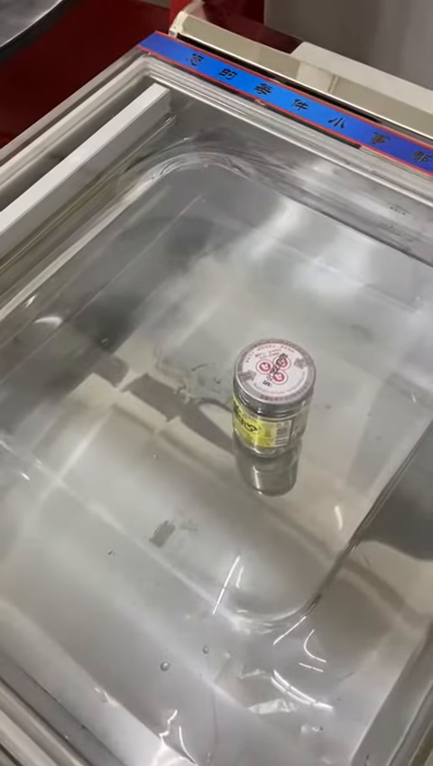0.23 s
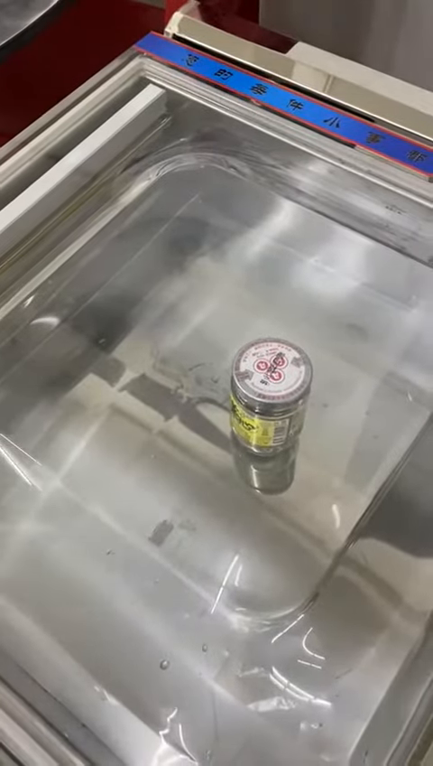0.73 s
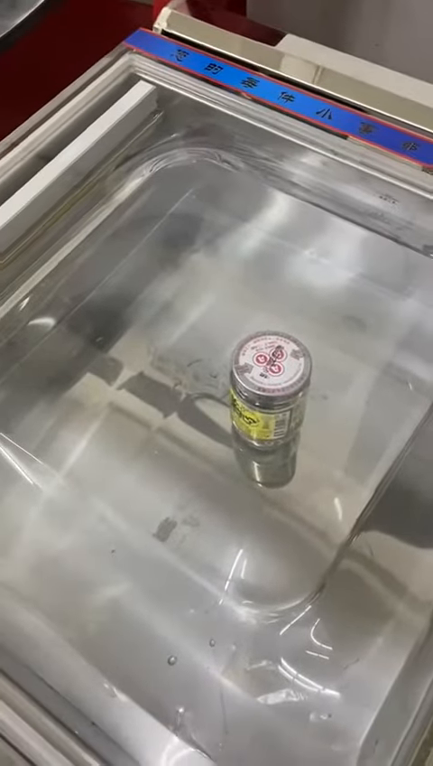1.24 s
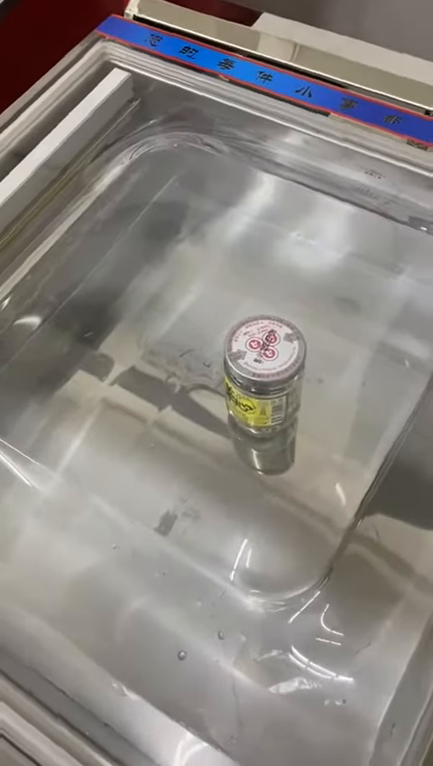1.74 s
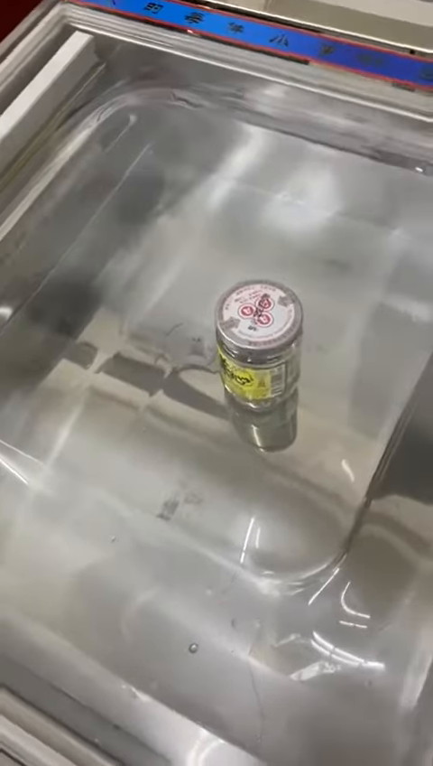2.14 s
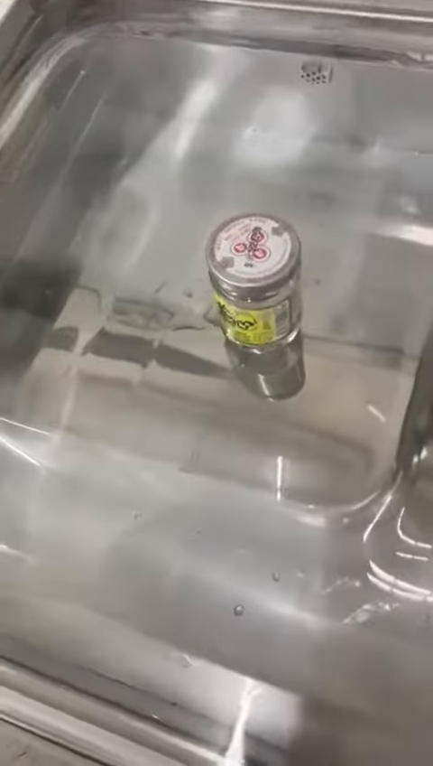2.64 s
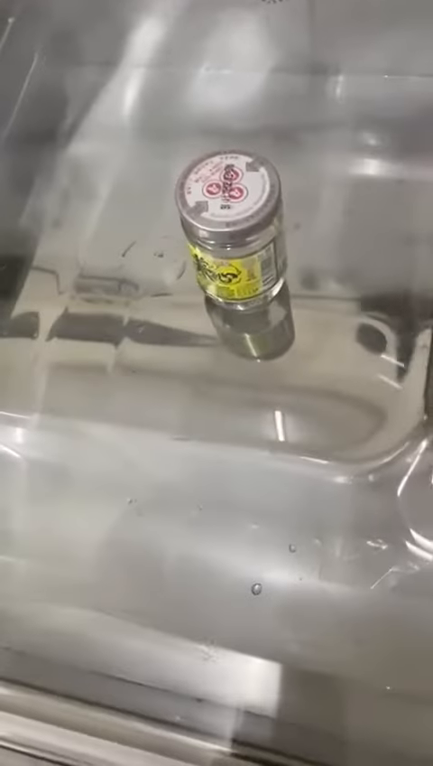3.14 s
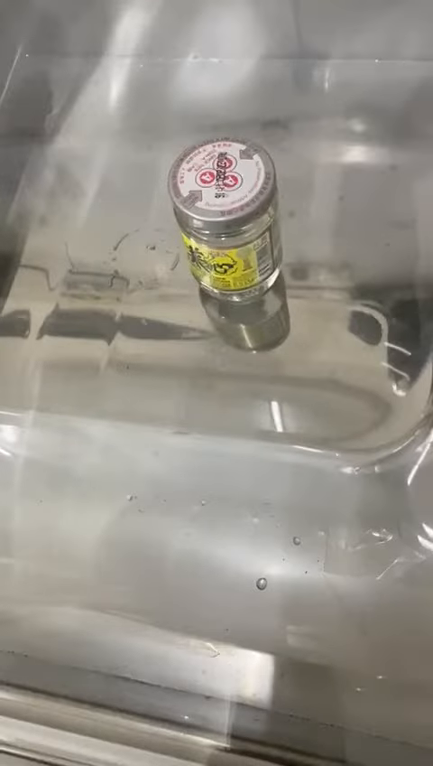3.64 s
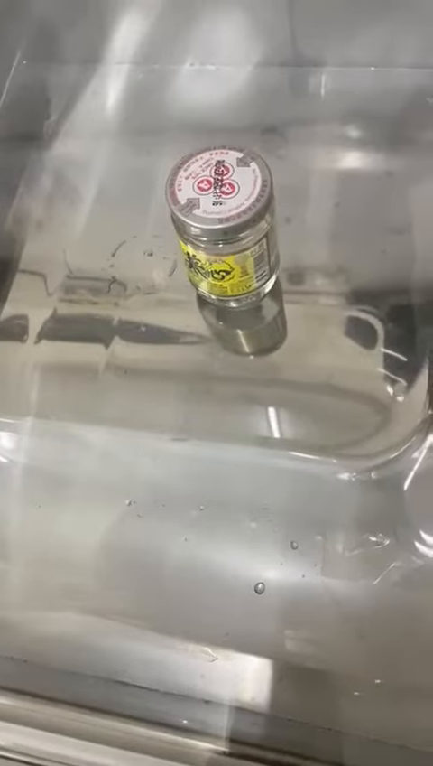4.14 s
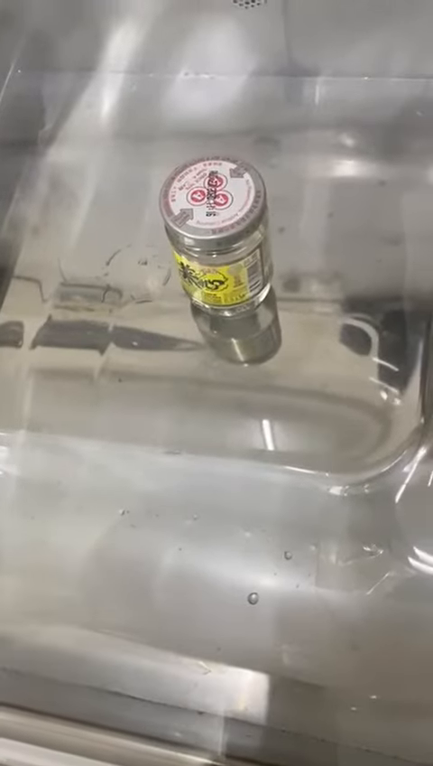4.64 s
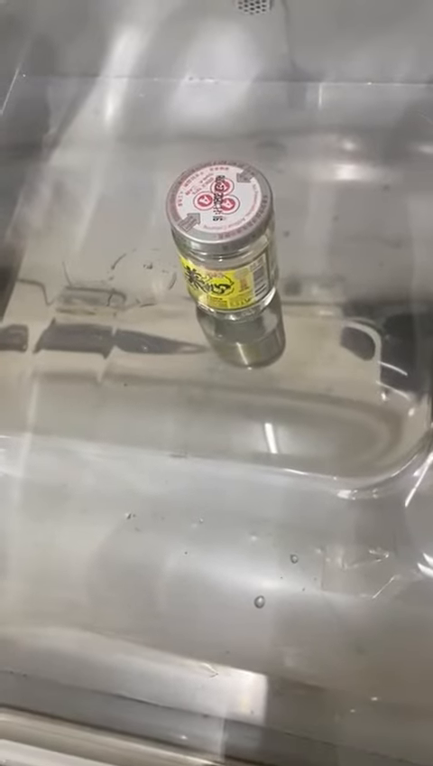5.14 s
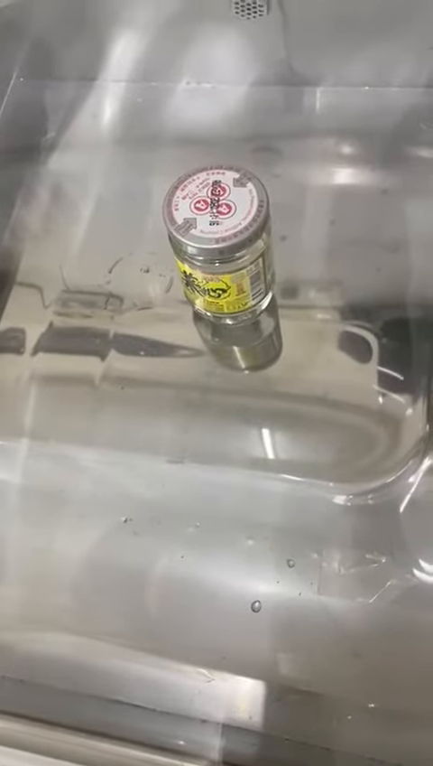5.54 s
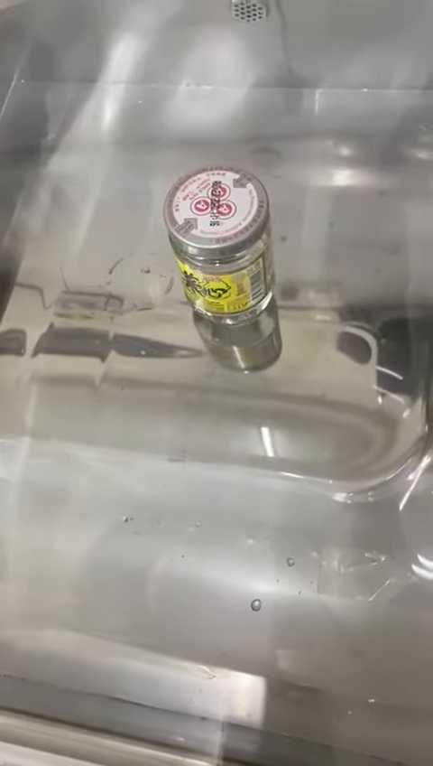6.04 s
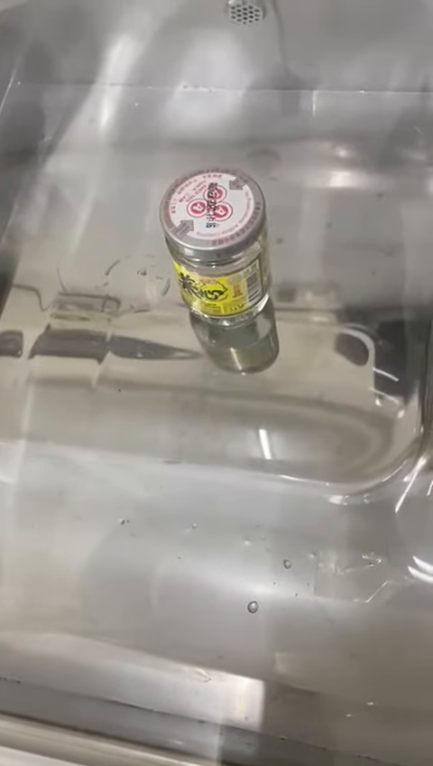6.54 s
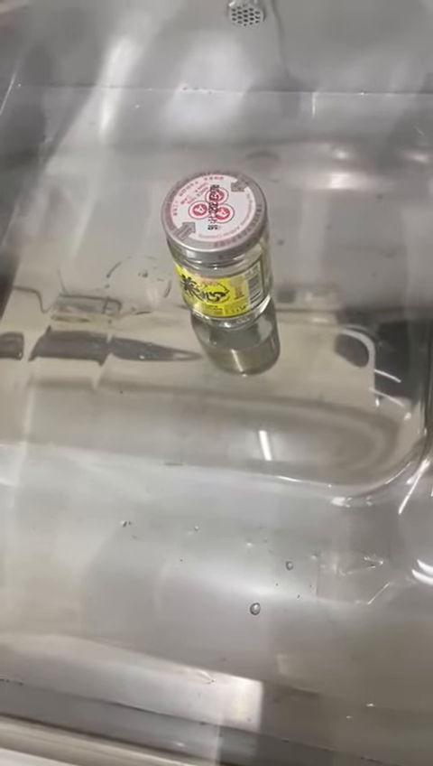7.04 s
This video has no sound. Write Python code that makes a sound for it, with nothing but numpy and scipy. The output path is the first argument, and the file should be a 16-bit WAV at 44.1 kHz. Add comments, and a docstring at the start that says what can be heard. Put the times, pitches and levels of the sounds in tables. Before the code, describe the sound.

A machine pump runs steadily for almost six seconds, humming low and throbbing, with rattle and hiss on top and metal panels resonating. The microphone moves in over the lid with a soft whoosh. Then a tight cluster of hard metallic snaps and thuds bursts out with a jet of air, a brief bright spitting follows, and the pump dies away, leaving faint singing tones and low room rumble.

```python
"""A three-vane pump hums and churns in the steel cabinet of a chamber vacuum sealer: shaft tones and pulsing noise.
As the chamber empties, its hiss thins and a whine grows; the microphone moves in over the lid after two seconds.
Then valves switch: short modes snap, noise cracks with thuds and steel ring clack, shaped noise puffs and spits.
The pump coasts down to a crawl. Behind it lie mains harmonics, a gliding drone, soft rubs and a low noise rumble."""
import sys
import numpy as np
from scipy import signal
from scipy.fft import rfft, irfft
from scipy.io import wavfile

SR = 44100
rng = np.random.default_rng(int(sys.argv[2]) if len(sys.argv) > 2 else 0)


def transcribe(u):
    """Save the signal u as a 16-bit wav file named by the first command-line argument.

    u: samples, shape (n,) or (channels, n), limited to [-1, 1]; the rate is SR.
    q: integer samples, one column per channel.
    """
    v = np.clip(np.atleast_2d(u).T, -1, 1)
    q = np.round(v * 32767).astype(np.int16)
    wavfile.write(sys.argv[1], SR, q)


N = 321930

# In all tables level_db is relative to the level set where the table is played,
# width_hz is the half-width at half amplitude, and t60_s counts from the end of the rise.

# Pump tones at full load, speed and vacuum: shaft_multiple, level_db
SHAFT_ORDERS = [(3, -34), (6, -48), (9, -54), (12, -48.5), (15, -51.5), (18, -51), (21, -54.5), (22, -57.5),
                (24, -56), (27, -60), (36, -65.5), (41, -60), (46, -74), (47, -72), (54, -72), (57, -70),
                (63, -59), (66, -62), (70, -67), (72, -59), (96, -73), (123, -63.5)]
# Noise colour of the churning air and oil: pitch_hz, level_db
CHURN_COLOUR = [(90, -20), (180, -6.5), (260, -0.5), (400, -1.5), (500, -3.5), (650, -3), (850, -9.5),
                (1100, -11), (1350, -19), (2000, -22), (4000, -29), (11000, -61)]
# Noise colour of the rattling middle and treble: pitch_hz, level_db
RATTLE_COLOUR = [(600, -18.5), (1300, -6), (1650, 1), (1900, -8.5), (2300, 0), (2750, -2.5), (3400, -1),
                 (4000, -8.5), (4800, -10.5), (5500, -6.5), (11000, -22)]
# Noise colour of the pump's hiss: pitch_hz, level_db
HISS_COLOUR = [(1500, -11.5), (3500, -4.5), (4200, 2.5), (5200, 6), (6000, 5), (6800, 5.5), (7700, 8.5),
               (9000, 4.5), (10200, 7), (11600, -6)]
# Cabinet panels shaken by the pump: pitch_hz, width_hz, level_db, change_before_move_in_db
CABINET_PANELS = [(58.5, 4.2, -39.5, 5), (133.2, 9, -43.5, -2), (162.6, 8, -41.5, -12),
                  (215.05, 5.9, -36, -1.5), (252, 6, -44, -2.5), (292.8, 7.4, -39, -9.5),
                  (352, 55, -41.5, -6), (386.3, 4.1, -50, -12), (406.3, 6, -48, -8), (542.3, 8.2, -51, 2.5),
                  (641, 24, -59.5, 10), (890, 33, -55, -16), (1180, 34, -61.5, 3), (1700, 140, -57, -10),
                  (2025, 8.8, -66.5, -10)]
# Short bright modes of the valve's armature: pitch_hz, level_db, t60_s
ARMATURE_MODES = [(1480, -18.5, 0.045), (1780, -17, 0.034), (2030, -10, 0.018), (2240, -20, 0.02),
                  (3290, -23, 0.022), (3660, -19, .02), (3990, -18, 0.053), (6300, -23, 0.035),
                  (6500, -24, .03), (8300, -26, .014), (8950, -23, 0.02), (9900, -18, 0.027),
                  (11200, -16, 0.022)]
# Valve and sealing-bar blows, and a last soft bump:
# start_s, crack_level_db, treble_corner_hz, ring_level_db, thud_level_db, thud_pitch_hz
BLOWS = [(5.7868, -17.5, 6000, -42.5, -37, 207), (5.7903, -22, 4000, -35, -16.5, 548),
         (5.794, -21.5, 5000, -26, -33, 400), (5.8042, -31, 1510, -24, -12.5, 326),
         (5.8100, -13.5, 1300, -14.5, -13.5, 397), (5.8166, -25.5, 2600, -41, -16.5, 800),
         (5.8234, -18, 870, -17, -19, 132), (5.8322, -19.5, 3000, -25, -16, 907),
         (5.8368, -19, 4000, -26, -24, 613), (5.8421, -15, 4500, -20, -17, 172),
         (5.859, -21, 700, -30, -6, 97), (6.860, -42, 596, -47, -22, 70)]
# Noise colour of a blow's crack: pitch_hz, level_db
CRACK_COLOUR = [(100, 2), (500, 5), (1300, -6.5), (2100, -10.5), (2700, -11.5), (3700, -14.5), (4600, -2.5),
                (5600, -19), (7000, -10), (8600, -9), (9600, -11), (11500, -6)]
# Steel modes that the blows ring: pitch_hz, level_db, t60_s
STEEL_MODES = [(246, -2, 0.22), (358, -0.5, 0.18), (459, -1, 0.17), (504, -6, 0.14), (593, -6.5, 0.25),
               (650, -13, .2), (723, -10, 0.14), (847, -4, 0.16), (930, -3, 0.19), (1040, -8, 0.16),
               (1126, -7.5, 0.15), (1159, -6, 0.15), (1396, -19, 0.18), (2300, -9.5, 0.33)]
# Resonances of the valve block, which colour cracks and jets alike: pitch_hz, width_hz, boost_db
VALVE_RESONANCES = [(2310, 100, 8.5), (2850, 84, 13), (3460, 140, 7), (4400, 50, 14), (6000, 90, 0),
                    (6250, 110, -4), (7000, 97, -1), (7420, 120, 7.5), (8500, 150, -3), (8750, 110, 8.5)]
# Puffs of air through the valves: start_s, level_db, rise_s, t60_s
AIR_PUFFS = [(5.802, -19, 0.0056, 0.17), (5.824, -17, 0.014, 0.083)]
# Noise colour of the puffs: pitch_hz, level_db
JET_COLOUR = [(300, -16), (1500, -19), (2400, -9), (3400, 2.5), (4200, -11), (4800, -5), (5150, 6.5),
              (5900, 3), (6900, -0.5), (7700, 6.5), (8500, -3), (9150, 0), (9550, -23), (11500, -5.5)]
# Spits of the vent: start_s, level_db, rise_s, t60_s
VENT_SPITS = [(5.970, -26.5, .0015, .08), (5.979, -26.5, 0.0022, 0.072), (5.988, -30, .002, .08)]
# Noise colour of the vent: pitch_hz, level_db
VENT_COLOUR = [(1500, -14), (3000, -9), (3500, -5), (4100, 2), (4800, 2.5), (5450, -13), (5700, 4),
               (6300, 1), (6900, 0), (7700, 3), (8700, 6.5), (9400, -1), (10700, 6), (11500, -4)]
# Resonances of the vent: pitch_hz, width_hz, boost_db
VENT_RESONANCES = [(3550, 55, 9), (4440, 45, 12), (5165, 25, 9.2), (5655, 35, 6), (5930, 50, 5),
                   (6180, 45, 4), (8450, 40, 4)]
# Tones that sing on as the air bleeds away: pitch_hz, jitter_turns, start_s, level_db, rise_s, t60_s
SINGING_TONES = [(1696, 0.34, 6.1, -53.5, 0.12, 3.0), (3550, .3, 5.97, -45, .013, 0.74),
                 (4830, 0.17, 5.97, -41.5, .05, 1.9)]
# Brief rubbing whooshes: start_s, level_db, rise_s, t60_s
RUB_WHOOSHES = [(1.92, -29.5, 0.11, 1.4), (4.45, -32, 0.25, 0.95), (6.71, -44, 0.046, 0.35)]
# Noise colour of the rubs: pitch_hz, level_db
RUB_COLOUR = [(120, -8), (230, 7), (370, -2), (500, -2), (650, -7), (1050, -8), (1500, -23), (2800, -35),
              (3900, -14), (5000, -32.5), (11000, -57)]
# Resonances that sing during a rub, before their pitch arches: pitch_hz, width_hz, level_db
RUB_RESONANCES = [(494, 12, -2), (713, 32, -9.5), (850, 29, -8.5), (1126, 80, -17), (3570, 110, -16.5),
                  (3880, 35, -18), (4200, 70, -23)]
# Mains hum: mains_multiple, level_db, change_before_move_in_db
HUM_HARMONICS = [(2, -2.5, -4), (4, -17.5, 1.5), (10, -27, -14), (14, -29, 7)]
# Swells of the low drone: start_s, hold_s, level_db
LOW_DRONE_SWELLS = [(-.2, 0.33, -25.5), (0.86, 0.61, -25)]
# Noise colour of the low rumble: pitch_hz, level_db
RUMBLE_COLOUR = [(10, -23), (28, -21), (45, -1), (65, -1.5), (85, 2.5), (110, -2.5), (135, -3.5),
                 (170, -4.5), (230, -10.5), (400, -31), (900, -74)]
# Surges added to the low rumble, relative to its steady level: start_s, level_db, rise_s, t60_s
RUMBLE_SURGES = [(0, -20, 0.072, 0.35), (.72, -21, 0.065, 0.48), (1.1, -6, 0.14, 0.81),
                 (4.03, -3, 0.073, 0.69), (6.72, -1.5, 0.13, 0.92), (7.1, -13, 0.04, 0.31)]
# Stereo image by pitch: pitch_hz, difference_over_sum_db, left_phase_lead_rad, left_over_right_db
STEREO_IMAGE = [(100, -42, 0, 0), (160, -28, 0, .3), (260, -19, 0, 1.3), (430, -13, -.15, 2.4),
                (750, -10, -.25, 0), (1100, -4, -.5, -1.6), (1550, -9, 0, 0), (1950, -14, .1, .4),
                (2400, 0, 0, -3), (2750, 5.5, 0, 0), (3300, -1.5, -.3, 2), (4000, -1, 0, -1),
                (4550, 12, 0, -1), (4900, 14, 0, -.5), (5300, -12, 0, 0), (6000, -20, 0, 0),
                (6600, -15, .1, 0), (7200, -7, .85, 0), (8200, -6, 1.55, 0), (9500, -7, 2.5, 0),
                (10400, -14, np.pi, 0), (11000, -25, np.pi, 0)]

SHAFT_HZ, VANES, MAINS_HZ = 49.0, 3, 50.0
WHINE_ORDER = 42  # multiple of the shaft rate
# time constants: the pump takes up its load quickly, the chamber empties slowly
TAKE_UP_S, PUMP_DOWN_S = 0.38, 22
# the motor is switched off, the shaft coasts down to a crawl, and at last the cabinet settles
MOTOR_OFF_S, COAST_START_S, COAST_S, CRAWL_SHARE = 5.73, 6.053, 0.099, 0.2
SETTLE_START_S, SETTLE_DB_PER_S = 6.77, 27
# the microphone moves in over the lid
MOVE_START_S, MOVE_LENGTH_S = 1.79, 0.41
# duller blows last longer: crack t60 at a 1 kHz treble corner, and the power by which it shortens above
CRACK_T60_S, CRACK_SHORTENING = 0.13, 0.24
DRONE_RISE_S, DRONE_T60_S, DRONE_QUIET_DB = 0.17, 0.84, -38.5
DRONE_START_HZ, DRONE_END_HZ, DRONE_GLIDE_S = 81, 92.5, 1.88
BAND_LIMIT_HZ = 11850


def pump_tones(turns, flutter_db=3.5, upper_order=18, unloaded_db=-7, upper_full_chamber_db=-4,
               low_speed_power=1.1, upper_speed_power=13.0):
    """Shaft orders, wavering more higher up; low ones come with the load, upper ones with vacuum and die first."""
    shaft_db = 20 * np.log10(speed())
    low_db = unloaded_db * (1 - load()) + low_speed_power * shaft_db
    upper_db = upper_full_chamber_db * (1 - vacuum()) + upper_speed_power * shaft_db
    flutters = [waver(7.1) for _ in range(VANES)]
    out = np.zeros((2, N))
    for order, level_db in SHAFT_ORDERS:
        # each order borrows one flutter, shifted in time
        flutter = np.roll(flutters[rng.integers(VANES)], rng.integers(N))
        height = min(order / upper_order, 1)
        state_db = (1.0 - height) * low_db + height * upper_db
        wavering_db = flutter_db * np.sqrt(height) * flutter
        out += amp(level_db + state_db + wavering_db) * tone(order * turns)
    return out


def whine(turns, level_db=-51, full_chamber_db=-22, flutter_db=4.5, t60=0.84, jitter_turns=0.091):
    """One high, grainy shaft order that stands out as the vacuum deepens and fades once the motor is off."""
    fade_db = -60 * since(MOTOR_OFF_S) / t60
    db = level_db + full_chamber_db * (1 - vacuum()) + flutter_db * waver(3.1) + fade_db
    return amp(db) * tone(WHINE_ORDER * turns + jitter_turns * waver(30))


def pump_air(turns, pulsing=0.052, sputter_db=1.12, spit_db=0.5):
    """Each vane pushes out a gulp of air and oil, so the noise throbs and sputters; the hiss thins early."""
    throb = 1 + pulsing * np.cos(2 * np.pi * VANES * turns)
    gulps = unit(throb * amp(sputter_db * waver(29)))
    churn = air_level(full_db=-37.5, empty_db=-34.0, earliness=0.72, speed_power=0.2)
    churn = churn * coloured(CHURN_COLOUR, ripple_db=2.1)
    rattle = air_level(full_db=-43.5, empty_db=-42.0, earliness=0.54, speed_power=0.95)
    rattle = rattle * coloured(RATTLE_COLOUR)
    hiss = air_level(full_db=-40.0, empty_db=-51.5, earliness=1.32, speed_power=1.9)
    hiss = hiss * coloured(HISS_COLOUR) * unit(amp(spit_db * waver(400)))
    return gulps * (churn + rattle) + np.sqrt(abs(gulps)) * hiss


def air_level(full_db, empty_db, earliness, speed_power):
    """Air-noise gain: moves from full-chamber to empty-chamber level, early or late, and falls with shaft speed."""
    air_left = np.clip(1 - vacuum(), 0, 1) ** earliness
    return amp(empty_db + (full_db - empty_db) * air_left) * speed() ** speed_power


def cabinet(panel_db=1.0, unloaded_db=-1.5, coasting_db=-1.0, full_chamber_db=-3):
    """Narrow panel resonances that the pump shakes harder as the chamber empties."""
    state_db = unloaded_db * (1 - load()) + coasting_db * (1 - speed()) + full_chamber_db * (1 - vacuum())
    shaking = amp(panel_db + state_db + settling_db())
    return shaking * (np.sqrt(farness()) * panels(1.0) + np.sqrt(1 - farness()) * panels(0))


def panels(far):
    """Noise ringing in the panels, as heard from close over the lid (far = 0) or from further back (1)."""
    power = 0
    for hz, width_hz, level_db, far_db in CABINET_PANELS:
        peak = resonance(hz, width_hz) ** 2
        power += amp(level_db + far * far_db) ** 2 * peak / peak.sum()
    return np.sqrt(power.sum()) * noise(np.sqrt(power))


def snap(start=5.7868, level_db=0.5, rise=0.00092):
    """The armature of the valve strikes home: a few short, bright modes."""
    age = clock() - start
    out = np.zeros((2, N))
    for hz, mode_db, t60 in ARMATURE_MODES:
        mode = np.sin(2 * np.pi * (hz * age + rng.random((2, 1))))
        out += amp(level_db + mode_db) * dying(start, t60, rise) * mode
    return out


def knocks(thud_t60=0.064, crack_rise=0.00048, tick_db=1.0, tick_t60=0.011, clatter_db=-2.0):
    """Each blow is a crack (a hard tick and its clatter), a low thud and a ring of the steel."""
    out, strikes = np.zeros((2, N)), np.zeros(N)
    colour = amp(over_hz(CRACK_COLOUR)[0]) * valve_body()
    for s, crack_db, corner_hz, ring_db, thud_db, thud_hz in BLOWS:
        clatter_t60 = CRACK_T60_S / (corner_hz / 1000) ** CRACK_SHORTENING
        tick = amp(tick_db) * dying(s, tick_t60, crack_rise)
        clatter = amp(clatter_db) * dying(s, clatter_t60, crack_rise)
        out += amp(crack_db) * (tick + clatter) * noise(colour / np.hypot(1, bins() / corner_hz))
        thud = np.sin(2 * np.pi * thud_hz * (clock() - s))
        out += amp(thud_db) * dying(s, thud_t60, 0.003) * thud
        strikes[round(s * SR)] += amp(ring_db)
    return out + amp(-8.0) * signal.fftconvolve(strikes[None], steel_ring(), axes=1)[:, :N]


def steel_ring():
    """Two seconds of the struck steel: decaying sines with unrelated phases in the two parts."""
    t = np.arange(2 * SR) / SR
    ring = np.zeros((2, len(t)))
    for hz, level_db, t60 in STEEL_MODES:
        decay = np.exp(-np.log(1000) * t / t60)
        ring += amp(level_db) * decay * np.sin(2 * np.pi * (hz * t + rng.random((2, 1))))
    return ring


def puffs(ragged_db=1.0):
    """Ragged jets of air from the valves: noise shaped by the valve block."""
    return bursts(AIR_PUFFS) * coloured(JET_COLOUR, valve_body()) * unit(amp(ragged_db * waver(300)))


def valve_body():
    """Gain per bin of the resonances of the valve block."""
    return amp(sum(db * resonance(hz, width_hz) for hz, width_hz, db in VALVE_RESONANCES))


def vent(leak_start=5.85, leak_db=-40.5, leak_rise=0.21, leak_t60=0.56, leak_top_hz=9500,
         flutter_db=1.5, ragged_db=-1.0, waver_db=4.0):
    """A vent leaks, spits brightly and dies away unevenly; a few grainy tones sing on."""
    leak = amp(leak_db + flutter_db * waver(18)) * dying(leak_start, leak_t60, leak_rise)
    spits = bursts(VENT_SPITS) * unit(amp(ragged_db * waver(400)))
    body = amp(sum(db * resonance(hz, width_hz) for hz, width_hz, db in VENT_RESONANCES))
    duller = 1 / (1 + (bins() / leak_top_hz) ** 20)
    singing = np.zeros((2, N))
    for hz, jitter_turns, s, level_db, rise, t60 in SINGING_TONES:
        level = amp(level_db + waver_db * waver(12)) * dying(s, t60, rise)
        singing += level * tone(hz * clock() + jitter_turns * waver(30))
    spitting = spits * coloured(VENT_COLOUR, body, ripple_db=6.0)
    leaking = leak * coloured(VENT_COLOUR, body * duller, ripple_db=4.0)
    return spitting + leaking + singing


def shudder(start=5.92, level_db=-27.0, rise=0.25, t60=0.95, centre_hz=130, width_hz=32):
    """Low band noise that swells and dies soon after the motor is switched off."""
    gain = 1 / (1 + ((bins() - centre_hz) / width_hz) ** 4)
    return amp(level_db) * dying(start, t60, rise) * noise(gain)


def rubs(tone_start=1.92, tone_db=-32, tone_rise=0.043, tone_t60=1.25, wander=0.0095,
         arch=.07, arch_s=1.99, arch_width_s=.045):
    """Soft rubbing whooshes; the strongest, as the microphone moves, sings in resonances that arch up and back."""
    pitch_arch = arch * np.exp(-((clock() - arch_s) / arch_width_s) ** 2)
    sliding_s = np.cumsum(1 + wander * waver(7) + pitch_arch) / SR
    tones = np.zeros(N)
    for hz, width_hz, level_db in RUB_RESONANCES:
        # slow noise times a quarter-turn pair makes a narrow band that slides in pitch
        parts = noise(resonance(0, width_hz)) * tone(hz * sliding_s)
        tones += amp(level_db) * unit(parts.sum(0))
    whooshes = bursts(RUB_WHOOSHES) * coloured(RUB_COLOUR, ripple_db=4.5, ripple_width_hz=25)
    return whooshes + amp(tone_db) * dying(tone_start, tone_t60, tone_rise) * tones


def mains_hum(level_db=-26, unloaded_db=-13.0, t60=2.9):
    """Even multiples of the mains: they come with the load and fade once the motor is off."""
    db = level_db + unloaded_db * (1 - load()) - 60 * since(MOTOR_OFF_S) / t60
    lines = np.zeros((2, N))
    for multiple, line_db, far_db in HUM_HARMONICS:
        lines += amp(line_db + far_db * farness()) * tone(multiple * MAINS_HZ * clock())
    return amp(db) * lines


def drone():
    """A low tone that creeps up in pitch and swells twice; a quiet remainder goes as the microphone moves in."""
    hz = DRONE_END_HZ + (DRONE_START_HZ - DRONE_END_HZ) * np.exp(-clock() / DRONE_GLIDE_S)
    swells = np.zeros(N)
    for s, hold, level_db in LOW_DRONE_SWELLS:
        rise = np.minimum(since(s) / DRONE_RISE_S, 1)
        swells += rise * amp(level_db - 60 * since(s + DRONE_RISE_S + hold) / DRONE_T60_S)
    steadiness = amp(.7 * waver(5))
    return (swells + amp(DRONE_QUIET_DB) * farness()) * steadiness * tone(np.cumsum(hz) / SR)


def rumble(level_db=-32.5):
    """A broad low noise that stays throughout and surges now and then."""
    return amp(level_db) * (1 + bursts(RUMBLE_SURGES)) * noise(amp(over_hz(RUMBLE_COLOUR)[0]))


def room(x, bass_t60=1.0, treble_t60=0.35):
    """A diffuse tail of decaying noise whose treble dies sooner than its bass."""
    hz, t, z = signal.stft(rng.standard_normal((2, SR)), SR, nperseg=256)
    t60 = np.interp(hz, [0, 6000], [bass_t60, treble_t60])[:, None]
    decaying = z * np.exp(-np.log(1000) * t / t60) * (t > .008)  # the tail starts after 8 ms
    tail = signal.istft(decaying, SR, nperseg=256)[1]
    return signal.fftconvolve(x, tail / np.linalg.norm(tail[0]), axes=1)[:, :N]


def load():
    """How much of its load the pump has taken up, 0-1."""
    return 1 - np.exp(-clock() / TAKE_UP_S)


def vacuum():
    """How empty the chamber is: 0 at first, 1 from when the motor is switched off."""
    pumped = 1 - np.exp(-np.minimum(clock(), MOTOR_OFF_S) / PUMP_DOWN_S)
    return pumped / (1 - np.exp(-MOTOR_OFF_S / PUMP_DOWN_S))


def speed():
    """Share of full shaft speed: steady, then coasting down to a crawl."""
    return CRAWL_SHARE + (1 - CRAWL_SHARE) / (1 + (since(COAST_START_S) / COAST_S) ** 2)


def farness():
    """1 before the microphone moves in over the lid, 0 after."""
    return 1 - np.minimum(since(MOVE_START_S) / MOVE_LENGTH_S, 1)


def settling_db():
    """The fall in level as the cabinet comes to rest."""
    return -SETTLE_DB_PER_S * since(SETTLE_START_S)


def amp(db):
    """Decibels to gain."""
    return 10 ** (np.asarray(db) / 20)


def unit(x):
    """Scales to rms 1."""
    return x / np.sqrt(np.mean(x ** 2) + 1e-20)


def clock():
    """The time of every sample, in seconds."""
    return np.arange(N) / SR


def since(s):
    """Seconds gone by after time s; 0 before it."""
    return np.maximum(clock() - s, 0)


def bins():
    """The frequency of every bin, in Hz."""
    return np.fft.rfftfreq(N, 1 / SR)


def over_hz(rows):
    """Each column of a frequency table, at every bin, interpolated over log frequency."""
    hz, *columns = np.transpose(rows)
    return [np.interp(np.log(bins() + 1), np.log(hz), column) for column in columns]


def resonance(hz, width_hz):
    """A single resonance peak of height 1, at every bin."""
    return 1 / (1 + ((bins() - hz) / width_hz) ** 2)


def noise(gain, channels=2):
    """Unrelated noises, together of rms 1, with the given gain per bin."""
    spectrum = rng.standard_normal((channels, len(gain), 2)).view(complex)[..., 0]
    return unit(irfft(spectrum * gain, N))


def coloured(spectrum, boost=1, ripple_db=3.0, ripple_width_hz=22):
    """Noise with the colour of a table; reflections leave a fine, fixed ripple on it."""
    grid = np.arange(0, SR / 2, max(ripple_width_hz, 5))
    ripple = np.interp(bins(), grid, rng.standard_normal(len(grid)))
    return noise(boost * amp(over_hz(spectrum)[0] + ripple_db * ripple))


def waver(hz):
    """Slow chance of rms 1, up to about hz."""
    return noise(resonance(0, hz), channels=1)[0]


def tone(turns):
    """A sine of rms 1, as two parts a quarter turn apart."""
    angle = 2 * np.pi * (turns + rng.random())
    return np.sqrt(2) * np.array([np.cos(angle), np.sin(angle)])


def dying(s, t60, rise):
    """An envelope that rises from time s and then dies away."""
    age = clock() - s
    decay = np.exp(-np.log(1000) * np.clip((age - rise) / t60, 0, 3))
    return np.clip(age / rise, 0, 1) * decay


def bursts(rows):
    """The summed envelopes of a table of start_s, level_db, rise_s, t60_s."""
    return sum(amp(level_db) * dying(s, t60, rise) for s, level_db, rise, t60 in rows)


def scene():
    """Pump, valves and background, as the part common to left and right and the part that differs."""
    turns = np.cumsum(SHAFT_HZ * speed() * (1 + 0.00049 * waver(1.72))) / SR
    pump = pump_tones(turns) + whine(turns) + pump_air(turns) + cabinet()
    valves = snap() + knocks() + puffs() + vent()
    background = shudder() + rubs() + mains_hum() + drone() + rumble()
    return pump + valves + background + amp(-14.5) * room(valves)


def record(dry):
    """Left and right agree in the bass and oppose near 4.7 kHz and at the very top; soft overload, band limit."""
    difference_db, lead_rad, balance_db = over_hz(STEREO_IMAGE)
    angle = np.arctan(amp(difference_db))
    fade = np.clip(np.minimum(clock(), clock()[::-1]) / .008, 0, 1)  # 8 ms at each end
    common, differing = rfft(dry * fade) * np.array([np.cos(angle), np.sin(angle)])
    leftward = amp(balance_db / 2) * np.exp(.5j * lead_rad)
    left = (common + differing) * leftward
    right = (common - differing) / leftward
    pair = np.tanh(irfft(np.array([left, right]), N))  # the loudest peaks are rounded off
    low_pass = signal.firwin(401, BAND_LIMIT_HZ, window=("kaiser", 9), fs=SR)
    return signal.oaconvolve(pair, low_pass[None], "same", axes=1)


dry = scene()
out = record(dry)
transcribe(out)
```